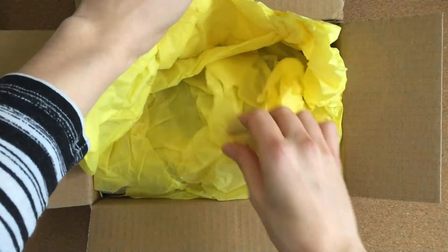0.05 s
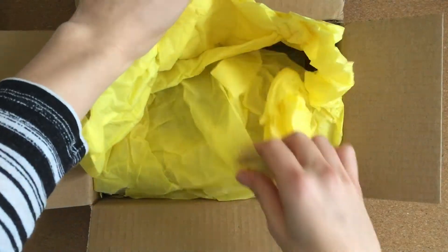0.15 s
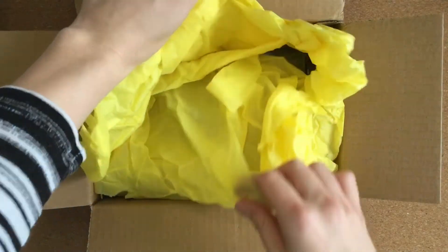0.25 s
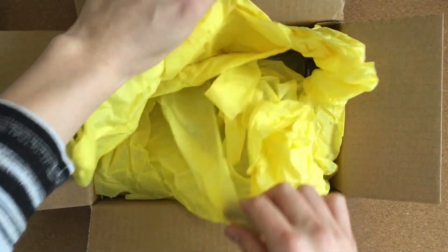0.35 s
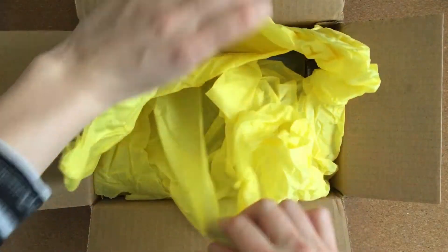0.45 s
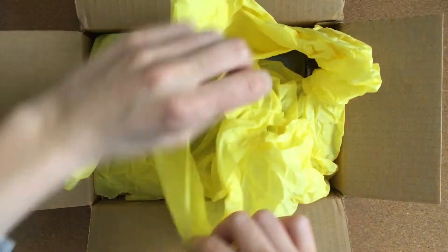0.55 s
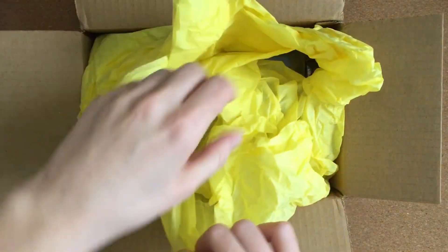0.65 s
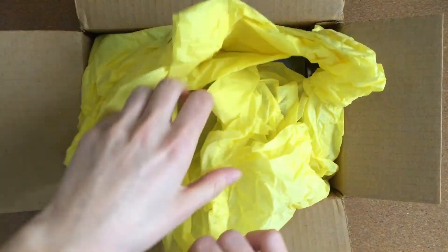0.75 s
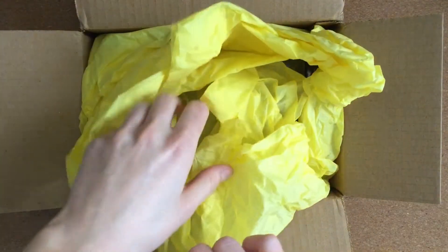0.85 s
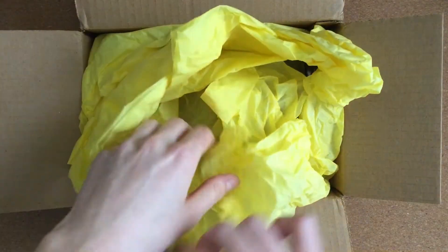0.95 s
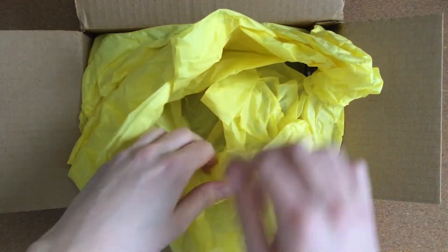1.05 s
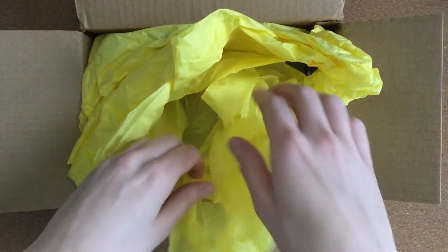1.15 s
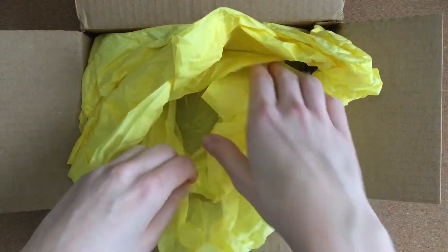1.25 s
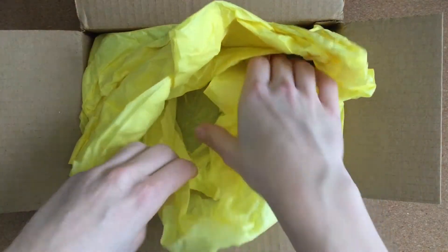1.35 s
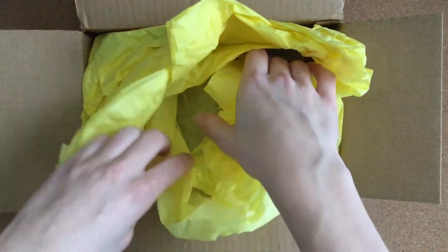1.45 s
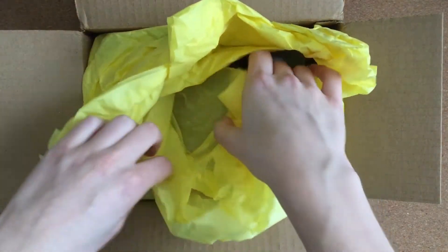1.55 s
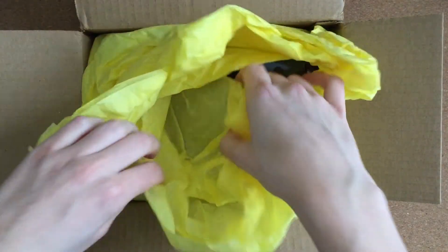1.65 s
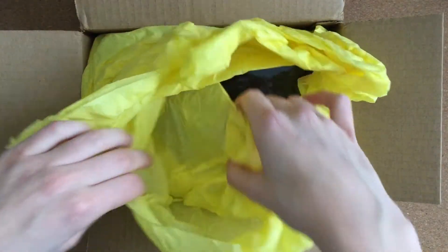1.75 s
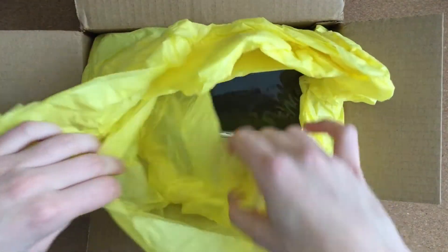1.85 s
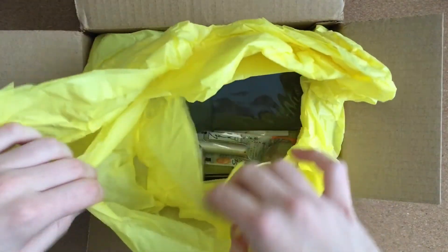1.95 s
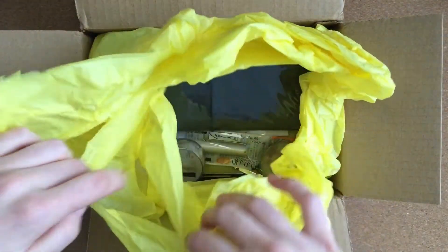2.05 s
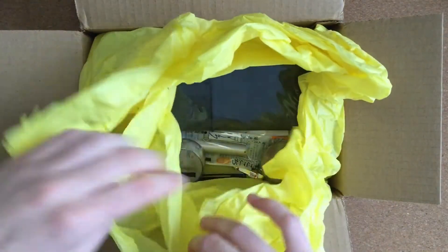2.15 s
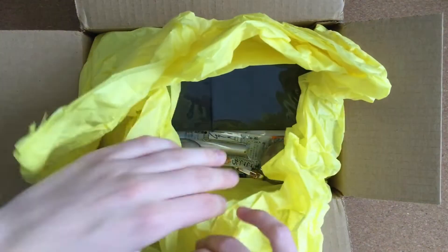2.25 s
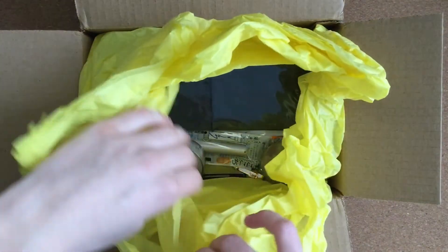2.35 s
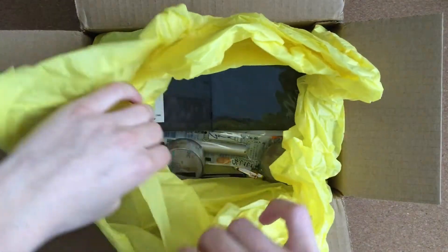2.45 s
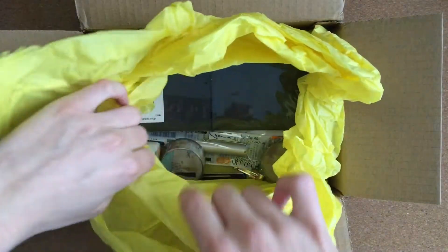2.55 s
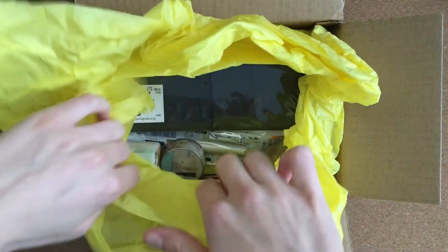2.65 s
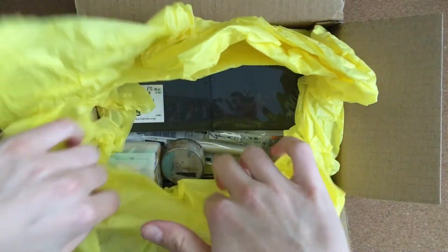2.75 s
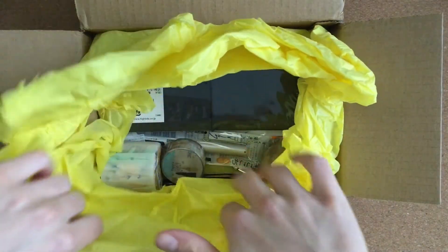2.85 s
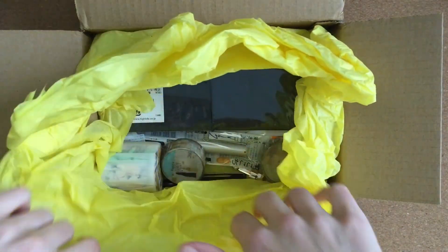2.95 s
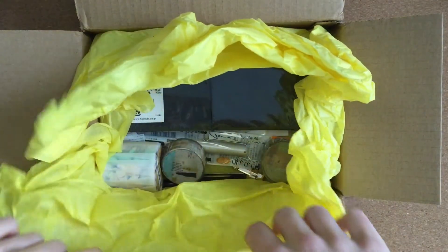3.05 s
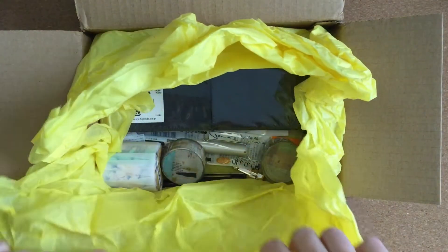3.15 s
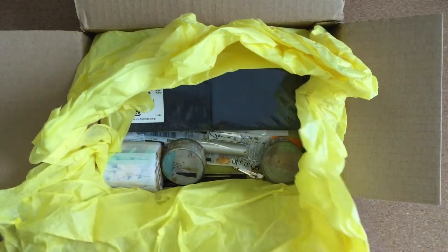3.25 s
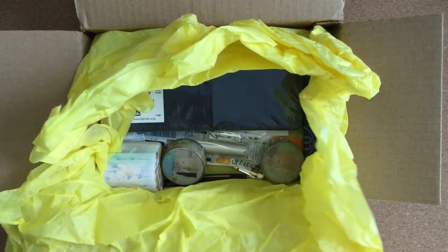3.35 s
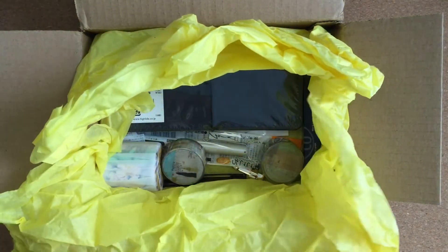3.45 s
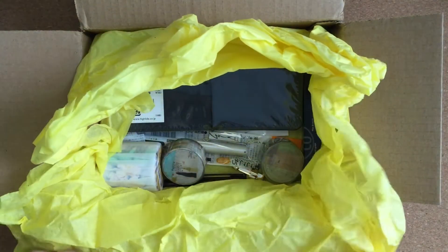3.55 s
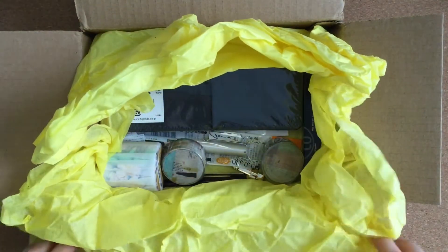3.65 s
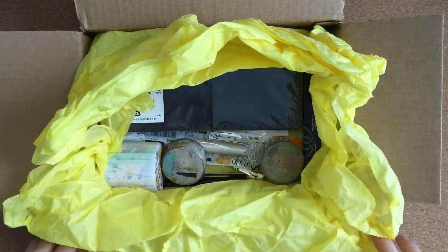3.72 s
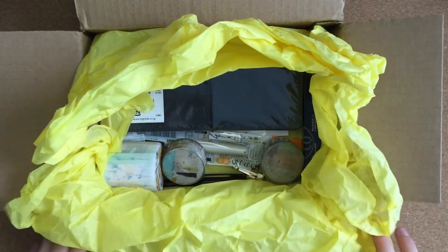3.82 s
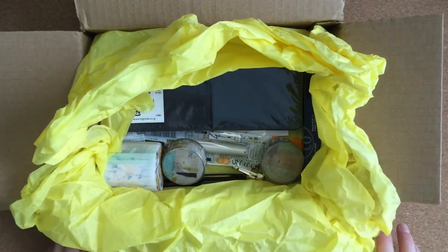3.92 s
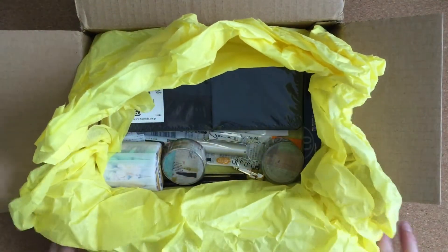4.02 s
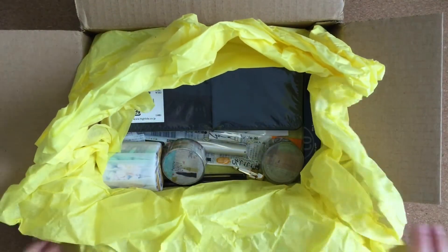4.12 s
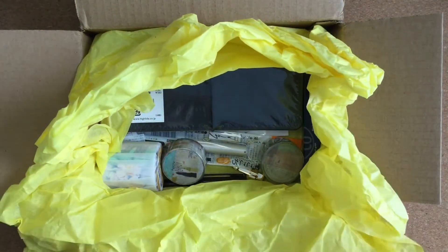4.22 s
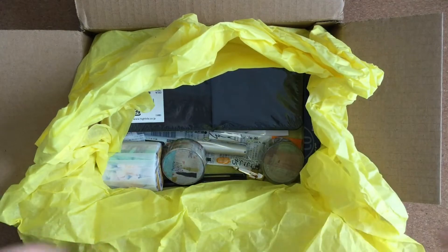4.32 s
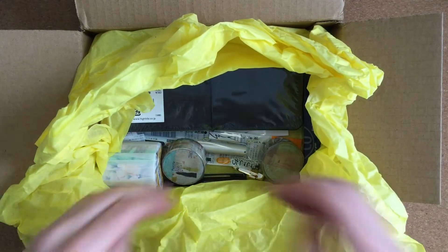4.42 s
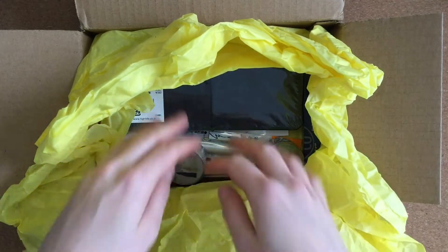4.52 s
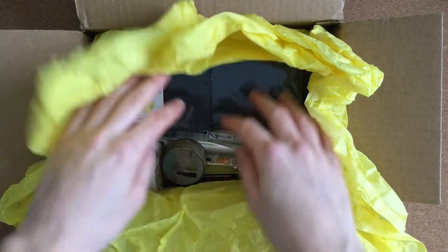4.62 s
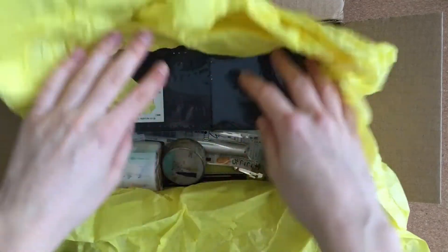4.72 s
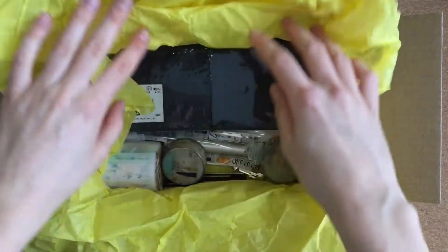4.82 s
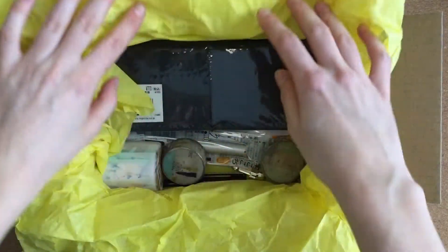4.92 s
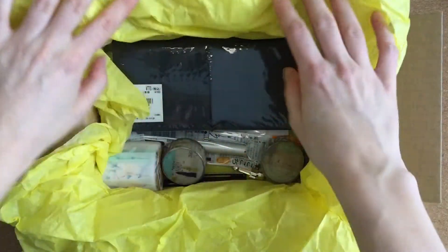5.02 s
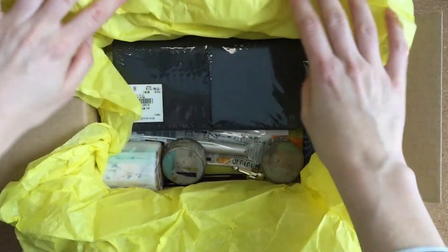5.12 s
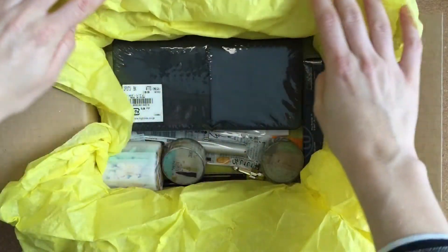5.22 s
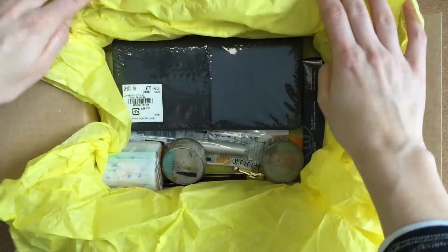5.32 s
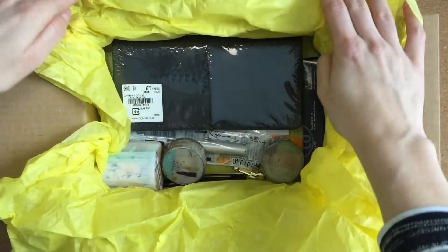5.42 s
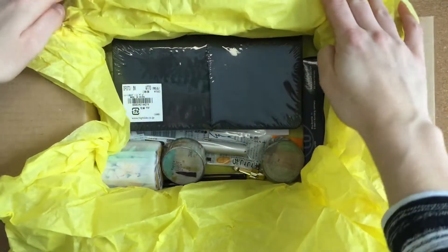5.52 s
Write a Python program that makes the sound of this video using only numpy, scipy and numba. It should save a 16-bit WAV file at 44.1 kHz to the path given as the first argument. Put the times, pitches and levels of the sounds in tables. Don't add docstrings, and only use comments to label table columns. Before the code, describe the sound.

Hands unfold crinkly tissue paper in a cardboard box with dense, dry rustling and sharp crackles, pause briefly, then press it aside.

```python
import sys
import numpy as np
from scipy import signal
from scipy.fft import rfft, irfft, next_fast_len
from scipy.io import wavfile
from scipy.ndimage import uniform_filter1d
from numba import njit

SR = 44100
rng = np.random.default_rng(int(sys.argv[2]) if len(sys.argv) > 2 else 0)


def volts(x):
    e = np.asarray(x, float) / 20
    return 10 ** e


def unload_wav(signal):
    wavfile.write(
        sys.argv[1],
        SR,
        np.round(np.clip(np.atleast_2d(signal).T, -1, 1) * 32767).astype(np.int16),
    )


N = 245825

CHANCE = rng.random((100, 5))


def evened(x):
    return x / np.sqrt(np.mean(x ** 2) + 1e-20)


def read(points, hz):
    f, value = np.transpose(points)
    return np.interp(np.log(hz + 1), np.log(f + 1), value)


def curve(rows, column):
    rows = np.array(rows)
    return np.interp(np.arange(N) / SR, rows[:, 0], rows[:, column])


def add(mix, s, sound):
    part = mix[round(s * SR):][:len(sound)]
    part += sound[:len(part)]


def coloured(x, db_of_hz):
    db = db_of_hz(abs(np.fft.fftfreq(4096, 1 / SR)))
    log_gain = np.log(volts(np.maximum(db, -100)))
    taps = np.fft.ifft(np.exp(np.conj(signal.hilbert(log_gain)))).real[:2048]
    return signal.oaconvolve(x, taps)[:len(x)]


def flicker(hz):
    return evened(signal.lfilter(*signal.butter(1, hz, fs=SR), rng.standard_normal(N)))


def strokes_db(rows):
    flank_shape = 1.5
    t = np.arange(0, N / SR + .002, .002)
    s, db, rise, fall = np.transpose(rows)[:, :, None]
    before = (s - t) / np.maximum(rise, .004)
    after = (t - s) / np.maximum(fall, .004)
    away = np.where(t < s, before, after)
    power = (volts(db - 10 * away ** flank_shape) ** 2).sum(0)
    return np.interp(np.arange(N) / SR, t, 10 * np.log10(power + 1e-12))


def work_db(column):
    # peak t/s, level/dB, 10 dB rise/s, 10
    # dB fall/s
    hand_strokes = [(0.227, -45.7, 0.48, 0.256), (0.48, -46.9, 0.364, 0.188), (0.575, -46.6, 0.029, 0.192),
                    (0.81, -48.8, 0.052, 0.246), (0.943, -54.2, 0.03, 0.015), (1.019, -53.6, 0.104, 0.025),
                    (1.121, -54.1, 0.094, 0.066), (1.216, -51.6, 0.045, 0.044), (1.365, -53.1, 0.053, 0.142),
                    (1.567, -56.2, 0.589, 0.221), (1.75, -47.7, 0.366, 0.033), (1.837, -46.5, 0.09, 0.044),
                    (2.03, -43.4, 0.39, 0.065), (2.129, -47.2, 0.038, 0.084), (2.288, -52.5, 0.243, 0.038),
                    (2.481, -49.7, 0.083, 0.042), (2.603, -47.1, 0.151, 0.017), (2.715, -46.5, 0.147, 0.376),
                    (2.924, -48.2, 0.599, 0.166), (3.105, -49.7, 0.11, 0.403), (3.203, -50.2, 0.015, 0.089),
                    (3.321, -46.1, 0.032, 0.368), (3.666, -45.5, 0.237, 0.106), (3.758, -51.1, 0.016, 0.188),
                    (3.952, -45.3, 0.324, 0.059), (4.115, -50.8, 0.175, 0.083), (4.207, -54.1, 0.074, 0.075),
                    (4.33, -61.5, 0.5, 0.045),
                    (4.635, -56.5, 0.022, 0.12),
        (4.745, -45.2, 0.062, 0.2),
        (4.904, -47.3, 0.033, 0.076),
        (5.054, -47.7, 0.141, 0.161),
        (5.262, -45.4, 0.134, 0.468),
        (5.534, -53.8, 0.032, 0.577),
    ]
    # t/s, breadth of folds/dB, weight on the box/dB
    grip = [(0, -1, 1.5), (.52, 2, 0), (.74, 3, 1), (.83, -1.5, 2), (1.02, -4, -3), (1.3, -2, -1),
            (1.38, 2, 1), (1.55, 0, -3), (1.9, 0.5, 3), (2.45, 0, -2.5), (2.9, -2.5, -0.5), (3.3, -2, 0),
            (3.55, -2, 1.5), (4.2, -1, -3.5), (4.38, 1, 0), (4.68, -0.5, 2), (5.1, -2, 0.5), (5.57, 1.5, 4)]
    slack_follows, thud_follows, thud_weight, thud_db = 1.17, 0.83, 0.34, -77
    effort = strokes_db(hand_strokes)
    breadth, weight = curve(grip, column=1), curve(grip, column=2)
    over = effort + 50
    fine = effort - breadth / 2
    wide = effort + breadth / 2
    slack = effort + (slack_follows - 1) * over + breadth / 2 + weight
    thud = thud_db + thud_follows * over + thud_weight * weight
    return [effort, fine, wide, slack, thud][column]


def snap_rows():
    # t/s, peak level/dB, wide patch f/Hz, bright crack level/dB
    standing_out = [(.146, -33, 2730, -3), (.36, -26, 1920, -5), (.3905, -33, 1980, -1),
                    (.4446, -32, 1700, -10), (.5726, -34, 1270, -9), (.6159, -34, 4090, -2),
                    (.6338, -32, 2370, -9), (.6648, -36, 1920, -7), (.81, -30, 1490, 2),
                    (.8831, -34, 2390, 0), (.9399, -37, 4160, 3), (1.0193, -38, 2580, 6),
                    (1.3066, -40, 2300, 1), (1.3882, -38, 1100, -1), (1.4764, -38, 2690, 0),
                    (1.6037, -36, 1530, 0), (1.6216, -33, 1640, -3), (1.8244, -32, 1570, -2),
                    (2.0428, -32, 2610, 1), (2.2882, -39, 1550, -5), (2.5927, -34, 1460, 0),
                    (2.6541, -33, 2020, -5), (3.0223, -36, 1850, -3), (3.0638, -34, 1340, 3),
                    (3.2439, -35, 900, 1), (3.318, -31, 2220, 3), (3.6196, -31, 900, 3),
                    (3.9892, -34, 900, 0), (4.0406, -39, 2370, 0), (4.2362, -42, 2050, 1),
                    (4.633, -48, 1770, -5),
        (4.6517, -45, 1260, -2),
        (4.9042, -32, 2390, -1),
        (4.977, -38.5, 1160, -6),
        (5.019, -33, 2110, 0),
        (5.084, -37, 2070, 7),
        (5.097, -41, 3500, 3),
        (5.3865, -30, 4030, 3),
    ]
    lesser = [.0218, .1692, .2014, .2937, .4802, .504, .5907, .7446, .7867, .9119, 1.2114, 1.2298, 1.4501,
              1.5392, 1.9086, 2.135, 2.1606, 2.4869, 2.7583, 2.797, 3.0964, 3.1406, 3.3093, 3.5715, 3.7752,
              3.959, 4.1924, 4.8066, 5.1843, 5.5032]
    over_db, spread_db, lesser_over_db = 10, 5.5, 1
    when, size, wide, small, crack = CHANCE.T
    small_hz = 5200 + 8500 * small
    marked = [(s, db, hz, small_hz[k], bright)
              for k, (s, db, hz, bright) in enumerate(standing_out)]
    strays = when[len(lesser):len(when) - len(marked)] * (N - 1) / SR
    s = np.r_[lesser, strays]
    db = work_db(column=0)[(s * SR).astype(int)] + over_db + spread_db * size[:len(s)]
    db += lesser_over_db * (np.arange(len(s)) < len(lesser))
    return marked + list(zip(s, db, 1100 * 3.83 ** wide, small_hz[::-1], -8 + 11 * crack))


def snap(hz, small_hz, crack_db, t60=.0105):
    t = np.arange(1536) / SR
    t60 = np.clip(t60, .002, .06)
    noise, shiver = rng.standard_normal((2, len(t)))
    crack = signal.lfilter([1, -.35], 1, noise) * volts(crack_db - 60 * t / min(0.96 * t60, .01))
    uneven = 1 + min(.6, 0.0068 / t60) * evened(uniform_filter1d(shiver, 24))
    wide = volts(-60 * t / t60) * np.sin(2 * np.pi * hz * t)
    small = volts(-3.0 - 60 * t / (0.85 * t60)) * np.sin(2 * np.pi * small_hz * t)
    return (crack + uneven * (wide + small)) * (1 - np.exp(-t / 0.00037))


def hush():
    # f/Hz, level per Hz/dB
    hiss = [(30, 0), (90, -11), (250, -11.5), (600, -22.5), (1500, -17.5), (3500, -19.5), (8000, -23),
            (16000, -35)]
    return volts(-79) * evened(coloured(rng.standard_normal(N), lambda hz: read(hiss, hz)))


def aftershocks(fade_s):
    s, db = np.array(snap_rows())[:, :2].T
    at, starts = np.round(s * SR).astype(int), np.zeros(N)
    starts[at] = np.clip((db - work_db(column=0)[at] - 5.5) / 10.0, .2, 2.5)
    return np.minimum(signal.lfilter([1], [1, -np.exp(-1 / (fade_s * SR))], starts), 2.5)


@njit
def scatter(places, sizes, kinds, shapes, length):
    out = np.zeros(length + shapes.shape[1])
    for p, s, k in zip(places, sizes, kinds):
        out[p:p + shapes.shape[1]] += s * shapes[k]
    return out[:length]


def crinkle(count=500):
    per_s = np.clip(5000 * volts(.4 * (work_db(column=0) + 49)), 700, 14000)
    per_s = per_s * volts(1.1 * flicker(hz=151))
    size = volts(2.54 * np.minimum(rng.exponential(1, N), 3.6))
    kicks = size * rng.choice([-1., 1.], N) * (rng.random(N) < per_s / SR)
    kicks /= np.sqrt(uniform_filter1d(uniform_filter1d(kicks ** 2, 1500), 1500) + 1e-9)
    kicks *= volts(1.62 * aftershocks(fade_s=0.007))
    at, patch = np.flatnonzero(kicks), rng.integers(0, count, N)
    pitches, ratios = np.geomspace(300, 9000, count), rng.uniform(1.366, 4.52, count)
    shapes = np.array([snap(hz, min(hz * ratio, 15000), 2.5, t60=0.0098 * (2000 / hz) ** 0.12)[:512]
                       for hz, ratio in zip(pitches, ratios)])
    shapes /= np.linalg.norm(shapes, axis=1)[:, None]
    return scatter(at, kicks[at], patch[at], shapes, N)


def paper():
    # f/Hz, level per Hz/dB
    colour = [(120, -20), (200, -14), (451, -8.5), (570, -10.5), (659, -5.5), (1780, -3), (4090, -3.5),
              (4890, -4), (8880, -7), (10500, -8), (15000, -11.5)]
    bed_db = [-2.5, -4, -21.5]
    fold_top_hz, box_hz = 3600, 580
    snaps = crinkle()
    size = next_fast_len(N)
    hz, z = np.fft.rfftfreq(size, 1 / SR), rfft(snaps, size)
    z = z / np.sqrt(uniform_filter1d(abs(z) ** 2, 2000) + 1e-20)
    z = z * volts(read(colour, np.minimum(hz, 15000)))
    fine = 1 / (1 + (fold_top_hz / (hz + 1)) ** 6)
    slack = 1 / (1 + (hz / box_hz) ** 12)
    sheet = np.zeros(N)
    for k, share in enumerate([fine, 1 - fine - slack, slack]):
        band = evened(irfft(z * share, size)[:N])
        sheet += volts(work_db(k + 1) + bed_db[k]) * band
    return sheet + pocket(snaps)


def cardboard():
    # f/Hz, level per Hz/dB
    rumble = [(24, -27), (40, -3), (113, 5.5), (220, -0.5), (290, -52), (480, -120)]
    # t/s, peak level/dB
    bumps = [(0.016, -66), (0.435, -57.5), (0.612, -74), (0.716, -65), (0.807, -79), (1.215, -70),
             (1.781, -59.5), (2.12, -66), (2.774, -62), (2.859, -58), (3.042, -68), (3.21, -63),
             (3.364, -58.5), (3.532, -56.5), (3.658, -59), (3.792, -62), (4.045, -67), (4.715, -66),
             (4.902, -60.5), (5.02, -69), (5.155, -65), (5.292, -62)]
    rise_s, fall_s, bump_db = .025, .06, -6
    lumps = rng.standard_normal(N) * volts(3.7 * flicker(hz=8.6))
    knocks = strokes_db([(s + rise_s, db + bump_db, rise_s, fall_s) for s, db in bumps])
    level = np.hypot(volts(work_db(column=4) - 4.5), volts(knocks))
    return level * evened(coloured(lumps, lambda hz: read(rumble, hz)))


def walls(x, count=3):
    # f/Hz, t60/s
    decay = [(200, .18), (1000, .12), (4000, .08), (14000, .06)]
    taps, out = np.zeros((count, SR // 4)), np.zeros(N)
    grid = np.arange(100, SR // 4 - 20, 20)
    at = grid + rng.integers(0, 20, (count, len(grid)))
    np.put_along_axis(taps, at, rng.choice([-1., 1.], at.shape), 1)
    hz, t, z = signal.stft(taps, SR, nperseg=256)
    t60 = np.clip(read(decay, hz), .02, .3)[:, None]
    tails = signal.istft(z * volts(-60 * t / t60), SR, nperseg=256)[1]
    for k, tail in enumerate(tails):
        turn = np.cos(np.pi * (np.arange(N) / SR * 7. + k / count)) * np.sqrt(2 / count)
        out += signal.oaconvolve(x * turn, tail / np.linalg.norm(tail))[:N]
    return out


def loud_snaps():
    # t/s, peak level/dB, wide patch f/Hz, small patch f/Hz, crack level/dB
    settling = [(4.311, -49, 2110, 3100, -2), (4.325, -45, 2530, 5900, 1), (4.341, -53, 4900, 7000, -2),
                (4.358, -50, 2620, 8900, -13), (4.358, -54.5, 650, 1490, -20), (4.371, -52, 5570, 12500, 2),
                (4.386, -49, 3570, 7000, -5), (4.404, -50, 2640, 3400, -12), (4.412, -65, 6600, 2700, -6),
                (4.425, -54, 4700, 14600, -6), (4.435, -69, 3000, 13000, -2), (4.448, -61, 2710, 7500, 0),
                (4.452, -52, 3120, 4270, -20), (4.4545, -48, 3820, 7500, 3), (4.464, -61, 11800, 8900, -3),
                (4.516, -53, 3000, 7900, 8), (4.561, -63, 3800, 3200, -14), (4.571, -68, 5050, 8000, 0),
                (4.581, -55, 2670, 2000, -18), (4.583, -62, 733, 785, -28), (4.601, -58, 6050, 11000, 3),
                (4.612, -47, 6050, 10900, 4)]
    out = np.zeros(N)
    ticks = [(*row, .014 * (2600 / row[2]) ** .85) for row in settling]
    for s, db, *how in snap_rows() + ticks:
        sound = snap(*how)
        add(out, s, volts(db - .8) * sound / abs(sound).max())
    return out


def resonate(x, hz, width):
    turn, r = np.exp(2j * np.pi * np.cumsum(hz) / SR), np.exp(-np.pi * width / SR)
    return 2 * (turn * signal.lfilter([1 - r], [1, -r], x / turn)).real


def pocket(snaps):
    # peak t/s, level/dB, 10 dB rise/s, 10 dB fall/s
    puffs = [
        (3.142, -54, .012, .03),
        (3.234, -57, .03, .03),
        (3.36, -58, .05, .45),
        (3.95, -55, .5, .09),
        (4.068, -53, .015, .025),
        (4.138, -60, .03, .04),
        (4.27, -68, .1, .07),
    ]
    start_hz, sinks_hz_per_s, from_s = 760, 78, 2.8
    sunk = np.clip(np.arange(N) / SR - from_s, 0, 1)
    hz = (start_hz - sinks_hz_per_s * sunk) * (1 + 0.089 * flicker(hz=15))
    ring = evened(resonate(resonate(snaps, hz, width=260), hz, width=260))
    return volts(strokes_db(puffs) - 4.5 + 1.5 * flicker(hz=13)) * ring


def scene():
    sheet = paper() + loud_snaps()
    return (sheet + volts(-13) * walls(sheet) + cardboard() + hush())[None]


def band_limit(x):
    return signal.sosfilt(signal.butter(12, 16400, fs=SR, output="sos"), x)


def record(dry):
    # f/Hz, width/Hz, level/dB
    notches = [(2500, 160, -2), (3600, 200, -2), (4900, 220, -4), (7600, 400, -2.5), (10400, 420, -5.5)]
    bass_cut_hz, edge_hz = 42, 15760
    heard = coloured(dry[0], lambda hz: sum(db * np.exp(-((hz - f) / w) ** 2) for f, w, db in notches))
    heard = signal.sosfilt(signal.butter(4, bass_cut_hz, "high", fs=SR, output="sos"), heard)
    edge = signal.firwin(1023, edge_hz, window=("kaiser", 9), fs=SR)
    heard = signal.oaconvolve(heard, edge, "same")
    return band_limit(heard[None])


dry = scene()
out = record(dry)
unload_wav(out)
```